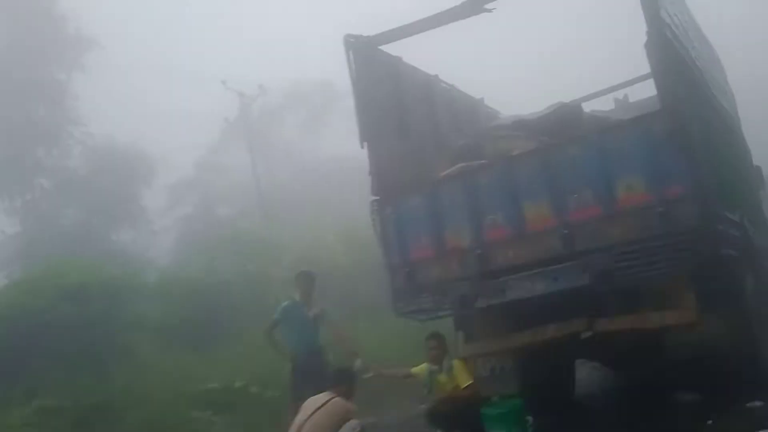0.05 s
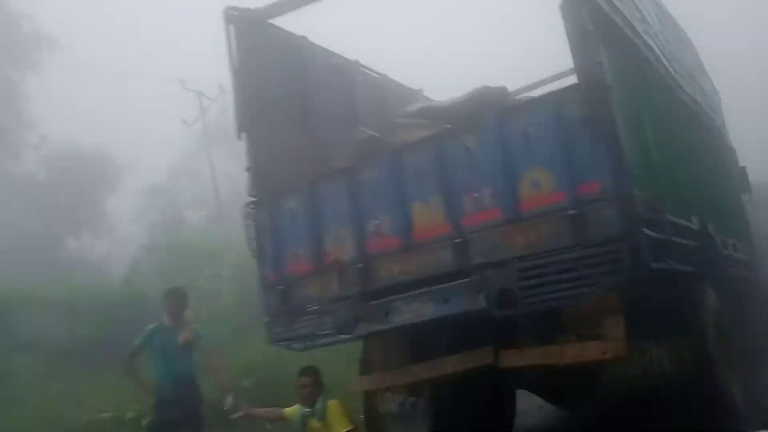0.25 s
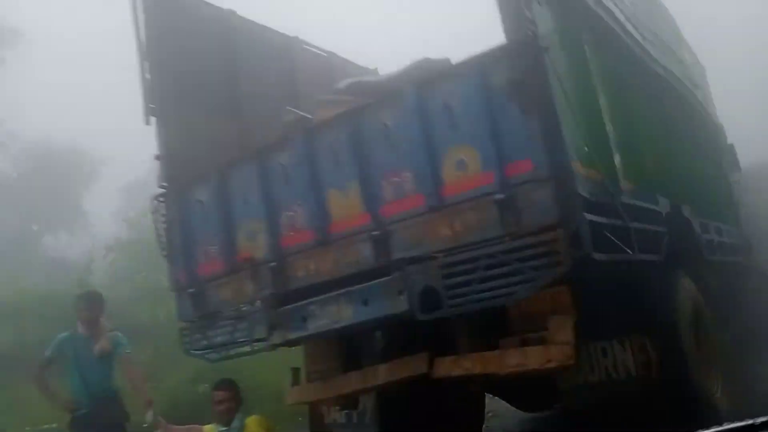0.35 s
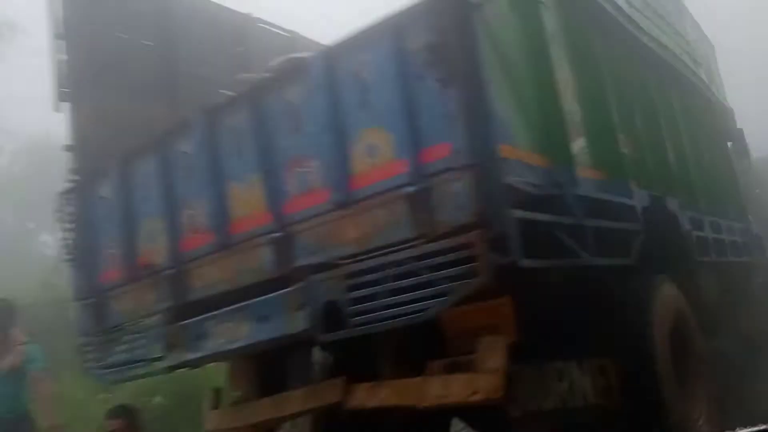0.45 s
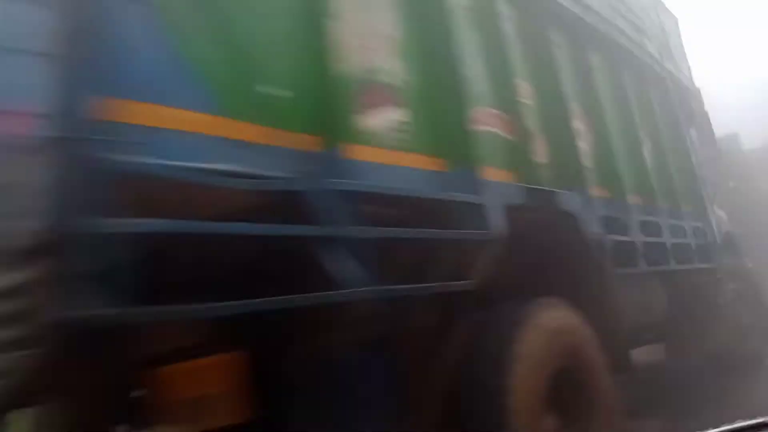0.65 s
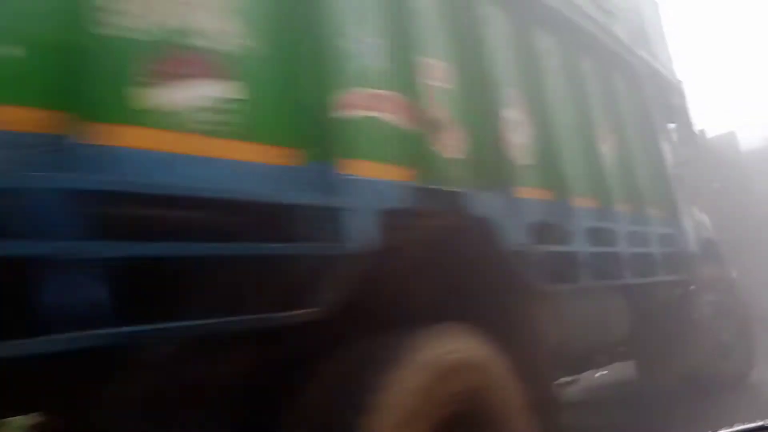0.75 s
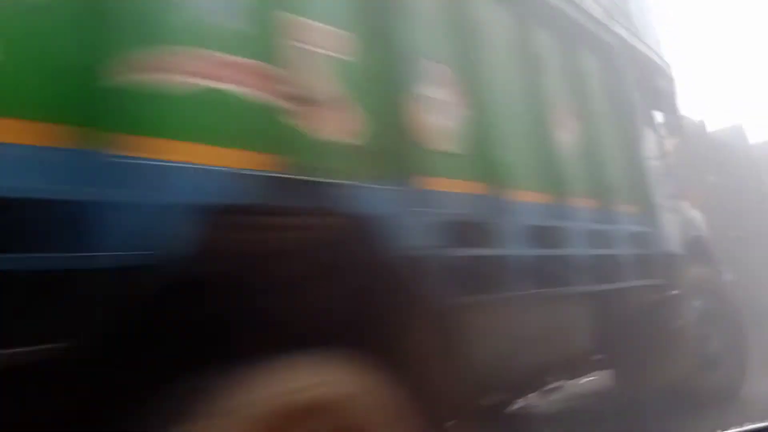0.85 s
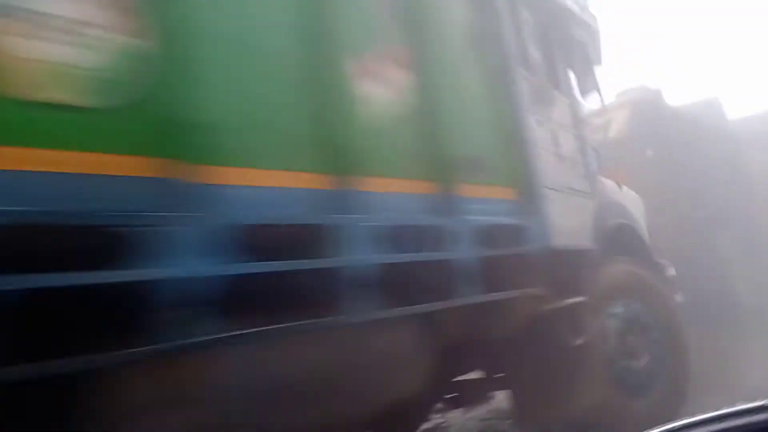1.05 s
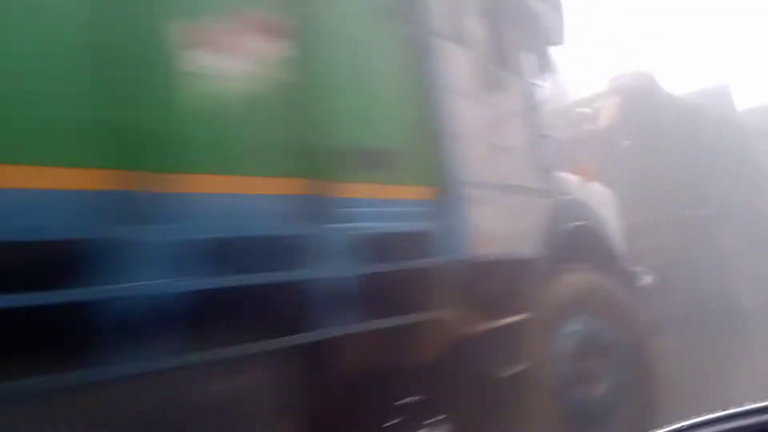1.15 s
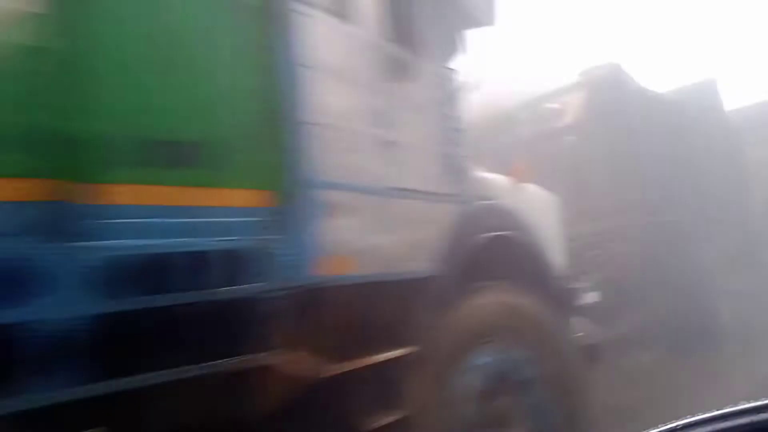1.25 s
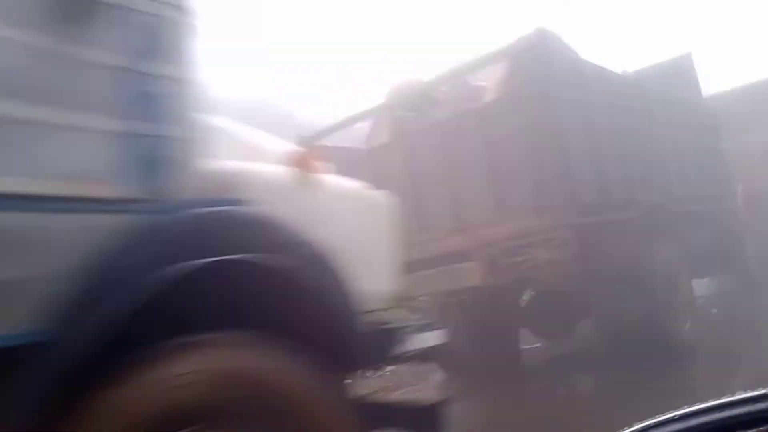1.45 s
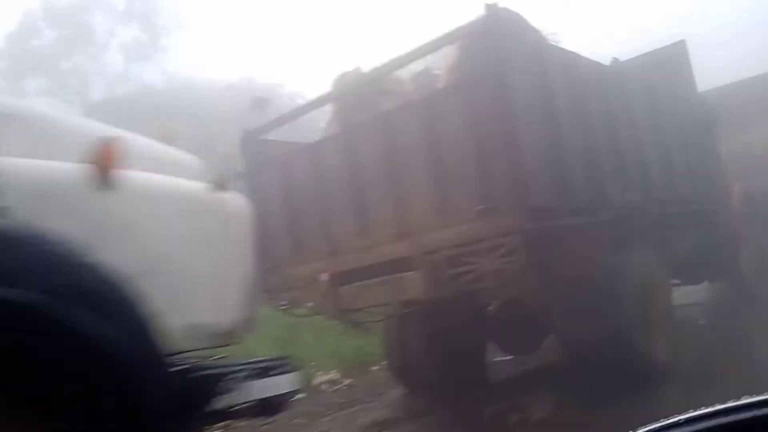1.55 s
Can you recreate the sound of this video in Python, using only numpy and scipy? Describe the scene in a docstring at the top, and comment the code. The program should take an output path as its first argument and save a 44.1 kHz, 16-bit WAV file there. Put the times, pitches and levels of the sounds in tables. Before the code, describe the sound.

Car horn honks four times in two pairs, echoing off trucks over low engine and tyre hiss

```python
"""Inside a car on a wet road: it overtakes lorries and sounds its two-tone horn in two double blasts.
Each horn is a sum of partials; delayed copies return from lorries and roadside, raised in pitch from
ahead and lowered from behind, and a decaying noise tail gives the far echo.
Under it: engine throb from wandering sines, rumble and wet-tyre hiss from coloured noise,
and a few bumps and a short rattle from noise swells."""
import sys
import numpy as np
from scipy import signal
from scipy.fft import rfft, irfft
from scipy.io import wavfile
from scipy.ndimage import uniform_filter1d

SR = 44100
rng = np.random.default_rng(int(sys.argv[2]) if len(sys.argv) > 2 else 0)


def wav_out(sig):
    """Save sig, one row per channel (or a flat mono array), as 16-bit PCM at SR to the path in sys.argv[1]."""
    wavfile.write(sys.argv[1], SR, np.round(np.clip(np.atleast_2d(sig).T, -1, 1) * 32767).astype(np.int16))


N = 70560
SPEED_M_S = 5.6  # car past the reflecting surfaces


def undb(db):
    """Amplitude ratio of a level in dB."""
    return 10 ** (np.asarray(db) / 20)


def curve(rows, at):
    """Straight lines through (x, y) rows."""
    x, y = np.array(rows, float).T
    return np.interp(at, x, y)


def walk(rate_hz):
    """Smooth random signal, spread near 1: held steps at rate_hz, averaged twice."""
    step_len = max(int(SR / rate_hz), 1)
    steps = np.repeat(rng.standard_normal(N // step_len + 3), step_len)
    smooth = uniform_filter1d(uniform_filter1d(steps, step_len), step_len)
    return np.sqrt(2) * smooth[step_len:step_len + N]


def noise(colour):
    """Gaussian noise of rms 1, shaped by (f/Hz, level/dB) rows joined over log frequency."""
    hz, db = np.array(colour, float).T
    bin_hz = np.maximum(np.arange(N // 2 + 1) * SR / N, 1)
    gain = undb(np.interp(np.log(bin_hz), np.log(hz), db))
    shaped = irfft(rfft(rng.standard_normal(N)) * gain, N)
    return shaped / shaped.std()


def engine(t, wander=0.016, flutter_db=3.0):
    """Low engine orders: their pitches wander together, each level flutters on its own."""
    # engine orders: f/Hz, level/dB before the level curve
    orders = [(80, -63.5), (108, -62), (137, -52), (163, -63.5), (192, -62), (222, -60.5)]
    # engine level: t/s, level/dB
    level_curve = [(0, -1), (.3, 3), (.7, 3), (1.0, -4.5), (1.6, -10.5)]
    warped_s = np.cumsum(1 + wander * walk(10)) / SR
    lines = np.zeros(N)
    for hz, db in orders:
        gain = undb(db + flutter_db * walk(18.1))
        lines += gain * np.sin(2 * np.pi * (hz * warped_s + rng.random()))
    return np.sqrt(2) * lines * undb(curve(level_curve, t))


def road(t, rumble_db=-46, rumble_flutter_db=2.5, spray_flutter_db=1.4):
    """Road rumble through the body plus tyre hiss on wet tarmac, both fluttering noise."""
    # rumble colour: f/Hz, relative density/dB per Hz
    rumble_colour = [(20, -28), (35, -19), (60, 1.5), (120, 1), (230, -1), (350, -7), (600, -16.5),
                     (1200, -31), (3000, -48)]
    # hiss colour: f/Hz, relative density/dB per Hz
    hiss_colour = [(300, -17), (700, -1.5), (1300, -3.5), (2000, 4), (2800, -1.5), (4000, -8), (6800, -8.5),
                   (8500, -20.5), (13500, -30.5), (15300, -18), (16000, -10)]
    # hiss level: t/s, level/dB
    hiss_level = [(0, -52), (.4, -49.5), (.78, -51), (1.0, -41.5), (1.15, -39.5), (1.3, -44), (1.42, -46),
                  (1.48, -45), (1.6, -42)]
    rumble = noise(rumble_colour) * undb(rumble_db + rumble_flutter_db * walk(20))
    hiss = noise(hiss_colour) * undb(curve(hiss_level, t) + spray_flutter_db * walk(60.3))
    return rumble + hiss


def horn(t, partials, pitch_column, count):
    """A buzzing diaphragm and its trumpet: partials build up on each press and ring out after it."""
    # blasts: start/s, end/s, level/dB, low horn f/Hz, high horn f/Hz, treble/dB
    blasts = np.array([(0.196, 0.36, -1.5, 427.8, 493.5, -1), (.423, .584, 0, 426.9, 494.9, -1.5),
                       (0.799, 1.03, -0.4, 425.6, 494.5, 0.5), (1.088, 1.257, 0, 427.1, 495.9, 6)])
    attack_s, release_s = 0.0068, 0.021
    bloom = 4  # upper partials arrive later
    waver, jitter = 0.001014, 0.0014  # slow and fast pitch spread, fraction of f
    treble_hz = 3270  # middle of the treble shelf
    tremor_db, tremor_hz = 1.88, 70.13  # shake of each partial's level

    latest = np.clip(np.searchsorted(blasts[:, 0], t) - 1, 0, len(blasts) - 1)
    row = blasts[latest].T
    start_s, level_db, treble_db = row[0], row[2], row[5]
    drive = np.zeros(N)
    for start, end in blasts[:, :2]:
        onset = 1 - np.exp(-np.maximum(t - start, 0) / attack_s)
        drive += onset * np.exp(-np.maximum(t - end, 0) / release_s)
    rise = 1 - np.exp(-np.maximum(t - start_s, 0) / attack_s)

    hz = row[pitch_column] * (1 + waver * walk(30.2) + jitter * walk(700))
    phase = 2 * np.pi * (np.cumsum(hz) / SR + rng.random())
    out = np.zeros(N)
    for k in range(1, count + 1):
        shelf = 1 / (1 + (treble_hz / (k * hz[0])) ** 4)
        partial_db = curve(partials, k) + level_db + shelf * treble_db
        gain = undb(partial_db) * drive * rise ** (bloom * (k - 1))
        gain = uniform_filter1d(gain, size=128)  # no clicks between blasts
        gain = gain * undb(tremor_db * walk(tremor_hz))
        out += gain * np.sin(k * phase + 2 * np.pi * rng.random())
    return np.sqrt(2) * out


def echo(x, t, abreast_s, side_m):
    """Sound thrown back by a surface that the car passes; the changing path shifts its pitch."""
    distance_m = np.hypot(SPEED_M_S * (t - abreast_s), side_m)
    source_sample = (t - 2 * distance_m / 343) * SR  # there and back at 343 m/s
    return np.interp(source_sample, np.arange(N), x) * 3 / np.maximum(distance_m, 2)  # gain 1 at 3 m


def horns(t):
    """Both horns, direct and by way of lorries, roadside and hillside."""
    # low horn partials: multiple of f, level/dB before blast level; gaps are interpolated
    low_partials = [(1, -32), (2, -33.5), (3, -26.5), (4, -31), (5, -29), (6, -33.5), (7, -41.5), (8, -43),
                    (9, -56), (11, -56.5), (14, -62.5), (17, -65.5), (24, -68), (36, -89)]
    # high horn partials: multiple of f, level/dB before blast level; gaps are interpolated
    high_partials = [(1, -26), (2, -36), (3, -37.5), (4, -32.5), (5, -51), (6, -41), (7, -48.5), (8, -59.5),
                     (12, -67.5), (15, -63.5), (22, -86.5), (31, -75)]
    # large surfaces passed: abreast t/s, sideways distance/m, echo level at 3 m/dB
    surfaces = [(0, 2.2, -20.5), (0.93, 1.5, -10.5), (1.03, 1.2, -10.5), (2.4, 1.5, -8), (3.5, 2.4, -9)]
    direct_db = -4
    beam_hz = 710  # lower sound spreads evenly and comes back weakly
    scatter_db, scatter_reach_m, scatter_side_m = -12.5, 8, 3.2
    far_db, far_t60_s = -20.5, 0.54

    both = horn(t, low_partials, 3, count=36) + horn(t, high_partials, 4, count=31)
    beam = signal.sosfilt(signal.butter(2, beam_hz, "high", fs=SR, output="sos"), both)
    out = undb(direct_db) * both
    for abreast_s, side_m, db in surfaces:
        out += undb(db) * echo(beam, t, abreast_s, side_m)
    # 14 small scatterers at random places along the road
    for along, side in rng.random(size=(14, 2)):
        abreast_s = t[-1] / 2 + (2 * along - 1) * scatter_reach_m / SPEED_M_S
        out += undb(scatter_db) * echo(beam, t, abreast_s, scatter_side_m * (.5 + side))
    tail = rng.standard_normal(N) * undb(-60 * t / far_t60_s)
    far = signal.fftconvolve(out, tail / np.linalg.norm(tail))[:N]
    return out + undb(far_db) * far


def knocks(t, rows, skirt_db=-26):
    """Short swells of noise, each in one resonance of the body."""
    out = np.zeros(N)
    for centre_s, spread_s, hz, db in rows:
        colour = [(hz / 4, 2 * skirt_db), (hz / 2, skirt_db), (hz, 0),
                  (hz * 2, skirt_db), (hz * 16, 4 * skirt_db)]
        swell = np.exp(-.5 * ((t - centre_s) / spread_s) ** 2)
        out += undb(db) * noise(colour) * swell
    return out


def scene():
    """Engine and road, the horns over them, then bumps and rattles."""
    # bumps through the body: centre t/s, Gaussian spread/s, f/Hz, level/dB
    bumps = [(1.421, 0.014, 85, -40), (1.425, 0.021, 207, -44), (1.481, 0.022, 223, -44)]
    # rattles: centre t/s, Gaussian spread/s, f/Hz, level/dB
    rattles = [(1.423, 0.0046, 1880, -43), (1.58, 0.009, 2560, -38.5), (1.583, .016, 2400, -45.5)]
    t = np.arange(N) / SR
    cabin = engine(t) + road(t)
    shocks = knocks(t, bumps, skirt_db=-21) + knocks(t, rattles, skirt_db=-38)
    return (cabin + horns(t) + shocks)[None]


def record(dry):
    """Steep elliptic low-pass that cuts the top."""
    top_hz = 15800
    return signal.sosfilt(signal.ellip(10, .2, 80, top_hz, fs=SR, output="sos"), dry)


dry = scene()
out = record(dry)
wav_out(out)
```